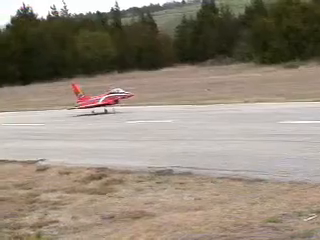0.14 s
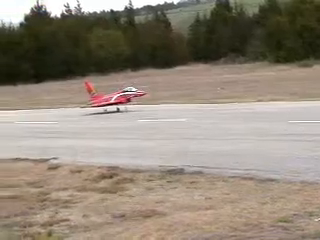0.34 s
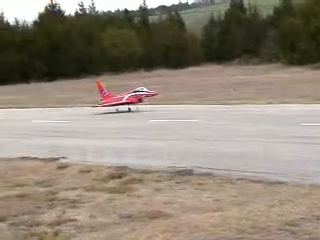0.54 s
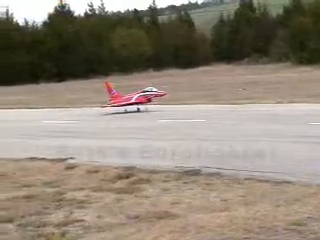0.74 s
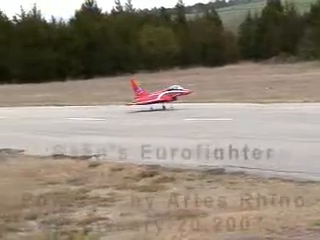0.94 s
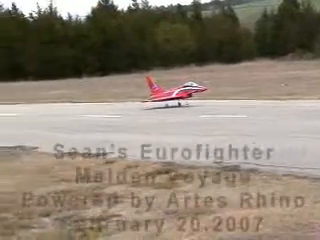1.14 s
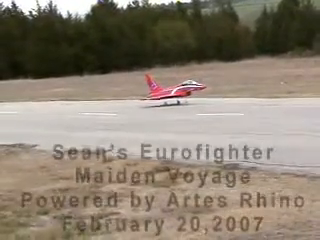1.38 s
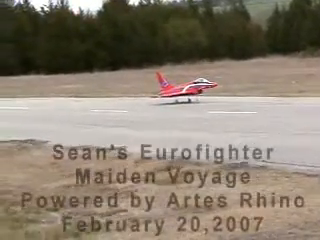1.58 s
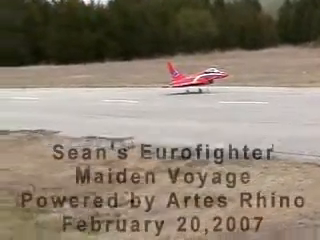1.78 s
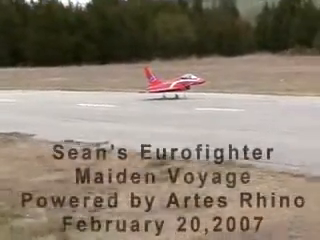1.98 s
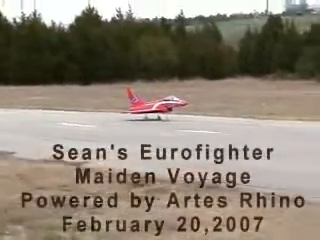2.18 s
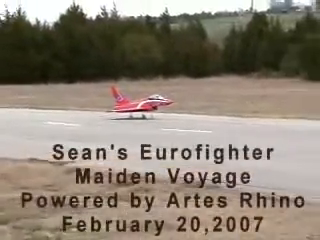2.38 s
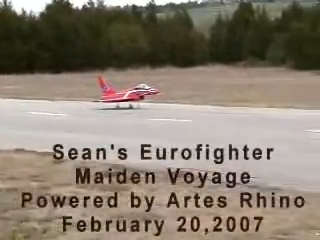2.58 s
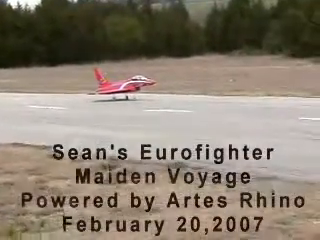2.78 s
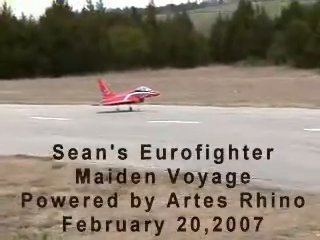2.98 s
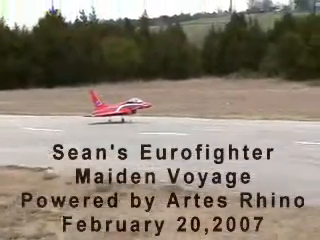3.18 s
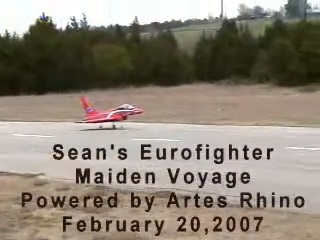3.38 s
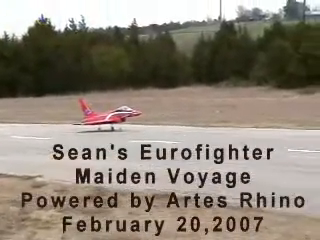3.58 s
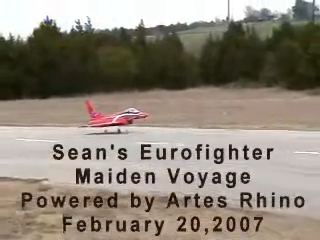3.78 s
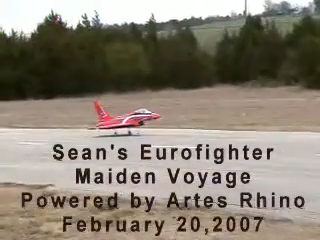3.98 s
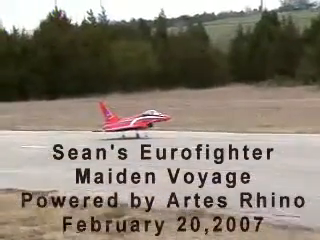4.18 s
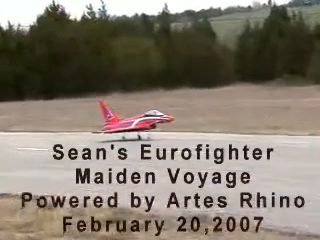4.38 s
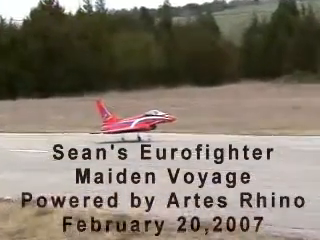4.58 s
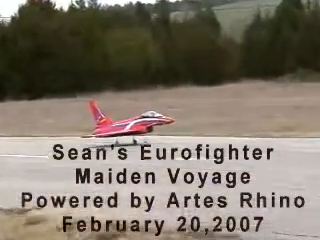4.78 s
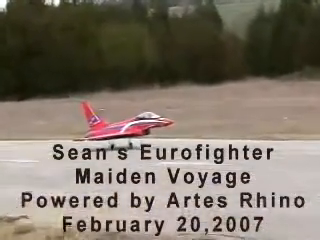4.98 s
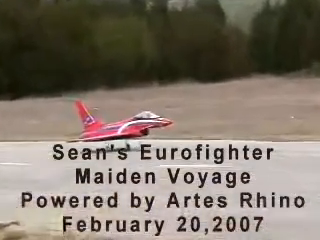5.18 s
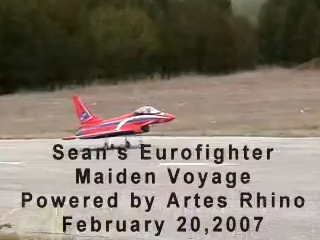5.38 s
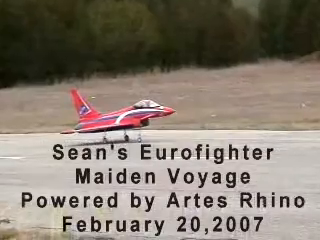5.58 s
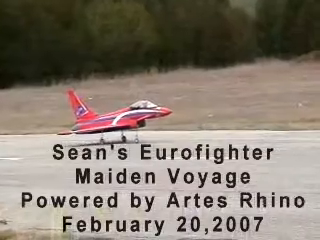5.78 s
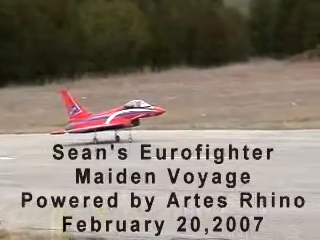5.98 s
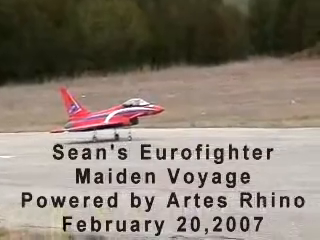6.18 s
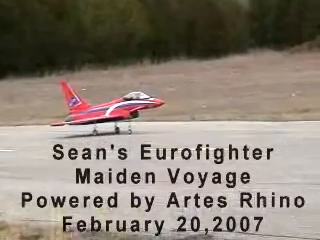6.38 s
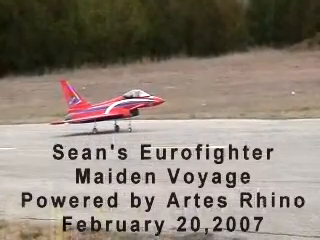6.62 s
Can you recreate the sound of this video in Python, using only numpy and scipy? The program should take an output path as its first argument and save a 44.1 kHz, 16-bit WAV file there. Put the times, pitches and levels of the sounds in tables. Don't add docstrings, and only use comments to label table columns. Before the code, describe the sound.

After brief silence, a small jet turbine idles with a piercing high whine and soft roar, then spools up into a louder, rougher rush.

```python
import sys
import numpy as np
from scipy import signal
from scipy.io import wavfile
from scipy.ndimage import uniform_filter1d, map_coordinates

SR = 44100
rng = np.random.default_rng(int(sys.argv[2]) if len(sys.argv) > 2 else 0)


def gain_from_decibels(decibels):
    exponent = np.asarray(decibels, float) / 20
    return 10 ** exponent


def wav_record(signal):
    frames = np.transpose(np.atleast_2d(signal))
    bounded = np.clip(frames, -1, 1)
    quanta = np.round(bounded * 32767).astype(np.int16)
    wavfile.write(sys.argv[1], SR, quanta)


N = 293265
TIME_S = np.arange(N) / SR

# time in s, shaft speed in Hz.
THROTTLE = [(0.6, 571.5), (0.794, 563.7), (1.487, 561.5), (2.595, 569.1), (2.837, 569.8), (3.703, 562.9),
            (4.114, 569.6), (4.556, 598.9), (5.009, 651.7), (5.789, 786.6), (6.144, 819.0), (6.65, 829.8)]
# time in s, level in dB.
WHINE_LEVEL = [(.6, -17.5), (.7, -19), (.95, -13.5), (1.2, -12), (1.83, -12.5), (1.95, -16), (2.2, -19),
               (2.45, -16.5), (2.75, -14), (3.2, -13), (3.45, -14.5), (3.95, -13), (4.08, -9.5),
               (4.2, -12.5), (4.33, -25), (4.45, -13), (4.65, -15.5), (4.97, -23)]
# time in s, level in dB.
BLADE_LEVEL = [(.6, -32.5), (1.3, -38), (2.9, -32), (4.1, -31), (4.45, -44), (5.2, -32), (5.62, -29),
               (6.1, -18.5), (6.6, -25)]
# multiple of the shaft speed, level in dB relative to the whine.
FAINT_TONES = [
    [11, -30.5],
    [13, -28],
    [19, -35],
]
# frequency in Hz, level in dB per Hz.
FLOW_COLOUR = [(40, -60), (90, -25), (170, -24.5), (330, -6.5), (750, -9.5), (1300, -22), (2400, -22),
               (4100, -22), (5600, -13.5), (7300, -29)]
# frequency in Hz, rise in dB per octave of shaft speed,
# rise in dB per 100 Hz/s of acceleration.
FLOW_RESPONSE = [(298, 8, 1.5), (836, 16, 1), (1190, 16.5, 1), (2250, 7.5, -0.46), (5360, 5, 0.54)]
# frequency in Hz, width in Hz, gain in dB.
HOUSING_MODES = [(537, 126, -15), (755.6, 168, 14.5), (1650, 125, 4.5), (1998, 171, -14.5),
                 (2404, 394, 11.5), (2968, 366, -8.5), (3735, 221, -14), (4090, 200, 5.5),
                 (4426, 243, -12.5), (5122, 168, -22.5), (5850, 290, -6.5), (928, 87, -4), (657, 44, 2.5)]
# frequency in Hz, left-right likeness from 0 to 1.
CHANNEL_LIKENESS = [(60, 0.3), (170, 0.97), (500, 0.95), (1450, 0.99), (4180, 0.92), (12100, 1)]
# frequency in Hz, left minus right in dB.
CHANNEL_LEAN = [(60, -17), (170, -0.5), (500, -1.5), (1450, -4), (4180, -1.5), (12100, -2.5)]
# peak in dB, frequency in Hz, length in s.
WHEEL_PUFFS = [
    (-27.5, 1750, 0.011),
    (-27, 2050, 0.0045),
    (-34, 1900, 0.01),
    (-45, 3700, .008),
    (-55, 50, 0.017),
]
PUFF_TIMES = [2.778, 2.786, 2.803, 1.71, 6.105]
# frequency in Hz, gain in dB.
INPUT_FILTER = [(7300, 0), (7800, -6), (8000, -12), (8400, -15), (8580, -60)]
# frequency in Hz, threshold in dB.
GATE_THRESHOLD = [(6000, -85), (7000, -59), (8000, -69.5), (10000, -66.5), (11300, -66), (12000, -69.5),
                  (12350, -65), (12600, -70)]


def rms_one(x):
    return x / np.sqrt(np.mean(x ** 2) + 1e-20)


def in_time(rows):
    s, values = np.transpose(rows)
    return np.interp(TIME_S, s, values)


def at_hz(points, hz):
    points = np.array(points)
    return np.interp(np.log(hz), np.log(points[:, 0]), points[:, 1])


def drift(rate):
    r = np.exp(-80 * np.pi * rate / SR)
    white = rng.standard_normal(N // 40 + 2002)
    slow = signal.lfilter([1], [1, -2 * r, r * r], white)[2000:]
    return np.interp(np.arange(N) / 40, np.arange(len(slow)), rms_one(slow))


def sides(hz):
    return gain_from_decibels(at_hz(CHANNEL_LEAN, hz) * np.array([[.5], [-.5]]))


def bell(hz, width_hz, db):
    w, wide, g = 2 * np.pi * hz / SR, np.pi * width_hz / SR, gain_from_decibels(db / 2)
    zeros = [1 + wide * g, -2 * np.cos(w), 1 - wide * g]
    poles = [1 + wide / g, -2 * np.cos(w), 1 - wide / g]
    return np.array(zeros + poles) / (1 + wide / g)


def housing(x, rows=slice(None)):
    return signal.sosfilt([bell(*row) for row in HOUSING_MODES[rows]], x)


def flow(shaft_hz, patchy_db, gust_db):
    octaves = np.log2(shaft_hz / shaft_hz.min())
    gaining = np.gradient(shaft_hz) * SR / 100
    nearer_db = 0.35 * TIME_S
    response = np.array(FLOW_RESPONSE)
    edges = 32 * 2 ** np.arange(0, 8.6, .5)
    white, gust, out = rng.standard_normal((2, 2, N)), drift(5.7), 0
    for k, (low, high) in enumerate(zip(edges, edges[1:])):
        band = signal.butter(2, [low, high], "band", fs=SR, output="sos")
        mid, side = signal.sosfilt(band, white[k % 2])
        hz = np.sqrt(low * high)
        speed_db = at_hz(response, hz) * octaves
        acceleration_db = at_hz(response[:, ::2], hz) * gaining
        flicker_db = gust_db * gust + patchy_db * drift(3.0)
        gain = gain_from_decibels(at_hz(FLOW_COLOUR, hz) + nearer_db + speed_db + acceleration_db + flicker_db)
        alike = np.clip(at_hz(CHANNEL_LIKENESS, hz), 0, 1)
        spread = np.sqrt((1 - alike) / (1 + alike)) * side * [[1], [-1]]
        out = out + gain * sides(hz) * (mid + spread)
    rumble_cut = signal.butter(2, 225, "high", fs=SR, output="sos")
    fold_guard = signal.cheby1(7, 1, 7210, fs=SR, output="sos")
    out = signal.sosfilt(rumble_cut, housing(out))
    return gain_from_decibels(-14.0) * rms_one(signal.sosfilt(fold_guard, out))


def wheels():
    out, white = 0, rng.standard_normal(N)
    for s, (db, hz, length_s) in zip(PUFF_TIMES, WHEEL_PUFFS):
        around = signal.butter(2, [hz / 1.08, hz * 1.08], "band", fs=SR, output="sos")
        band = rms_one(signal.sosfilt(around, white))
        swell = np.exp(-((TIME_S - s) / length_s) ** 2)
        out = out + sides(hz) * gain_from_decibels(db) * band * swell
    return out


def shaft():
    first, size = round(THROTTLE[0][0] * SR), round(0.4 * SR)
    hz = in_time(THROTTLE)
    rounded = uniform_filter1d(hz[first:], size=size, mode="nearest")
    rounded = uniform_filter1d(rounded, size=size, mode="nearest")
    hz[first:] = rounded
    hz[:first] = rounded[0]
    return hz


def main_blades(turns, flutter_db):
    tone = gain_from_decibels(in_time(BLADE_LEVEL) + 2 * flutter_db * drift(9)) * np.sin(6 * turns)
    return sides(4000) * housing(housing(tone), rows=slice(6, 9, 2))


def whine(shaft_hz, turns, flutter_db):
    edge_db = at_hz(INPUT_FILTER, 12 * shaft_hz)
    tones = gain_from_decibels(edge_db + flutter_db * drift(8)) * np.sin(12 * turns)
    for multiple, relative_db in FAINT_TONES:
        loss_db = at_hz(INPUT_FILTER, min(round(multiple), 13) * shaft_hz)
        loss_db = np.maximum(loss_db, 2 * edge_db - 30)
        level = gain_from_decibels(relative_db + loss_db + 3.7 * flutter_db * drift(4.4))
        tones += level * np.sin(round(multiple) * turns)
    return sides(11200) * gain_from_decibels(in_time(WHINE_LEVEL)) * tones


def compressor(shaft_hz, flutter_db, wobble):
    shaft_hz = shaft_hz * (1 + wobble * drift(19))
    turns = 2 * np.pi * np.cumsum(shaft_hz) / SR
    return np.sqrt(2) * (main_blades(turns, flutter_db) + whine(shaft_hz, turns, flutter_db))


def scene():
    shaft_hz = shaft()
    centring_from_s = 3.3
    centred = np.clip((TIME_S - centring_from_s) / (N / SR - centring_from_s), 0, 1)
    gas = flow(shaft_hz, patchy_db=0.81, gust_db=0.5)
    jet = gas + compressor(shaft_hz, flutter_db=0.68, wobble=0.00017)
    return jet * gain_from_decibels(1.6 * centred * [[.5], [-.5]]) + wheels()


def spectral_gate(x):
    hz, s, cells = signal.stft(x, SR, nperseg=1024)
    patch = uniform_filter1d(np.abs(cells[0]) ** 2, size=3, axis=0)
    patch = uniform_filter1d(patch, size=5, axis=1)
    loud_db = 10 * np.log10(uniform_filter1d(patch.sum(axis=0), size=20))
    wander_db = 0.8 * np.interp(s * SR, np.arange(N), drift(9.8))
    shift_db = 0.14 * (loud_db - loud_db.mean()) + wander_db
    threshold_db = at_hz(GATE_THRESHOLD, hz + 1)[:, None] + shift_db
    cells = cells * (patch > gain_from_decibels(2 * threshold_db))
    return signal.istft(cells, SR, nperseg=1024)[1][:, :N]


def band_limit(x):
    return signal.sosfilt(signal.butter(12, 12690, fs=SR, output="sos"), x)


def record(dry):
    slow_rate_hz, start_s, fade_in_s, offset = 16005, .6024, .002, .0018
    ticks = np.arange(0, TIME_S[-1] + 2 / slow_rate_hz, 1 / slow_rate_hz)
    taken = [map_coordinates(side, [ticks * SR], order=5, mode="nearest") for side in dry]
    joined = np.array([np.interp(TIME_S, ticks, side) for side in taken])
    fade_in = np.clip((TIME_S - start_s) / fade_in_s, 0, 1)
    running = (spectral_gate(joined) + offset) * fade_in
    return band_limit(np.clip(running, -1, 1))


dry = scene()
out = record(dry)
wav_record(out)
```